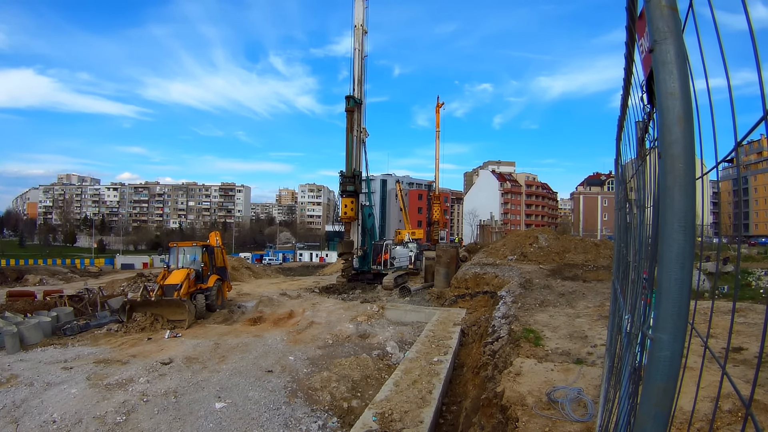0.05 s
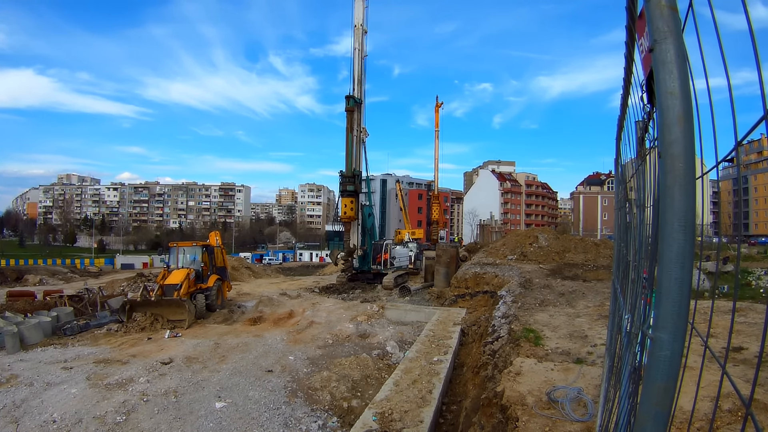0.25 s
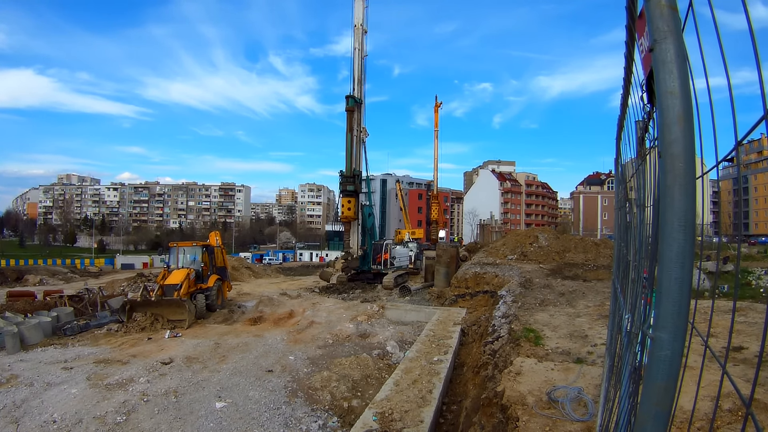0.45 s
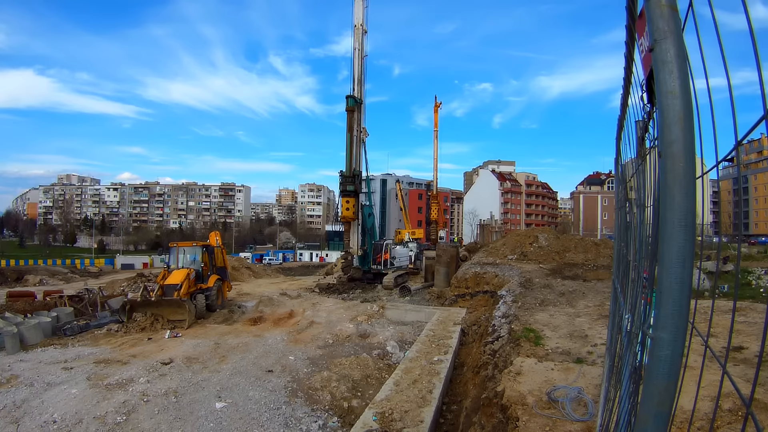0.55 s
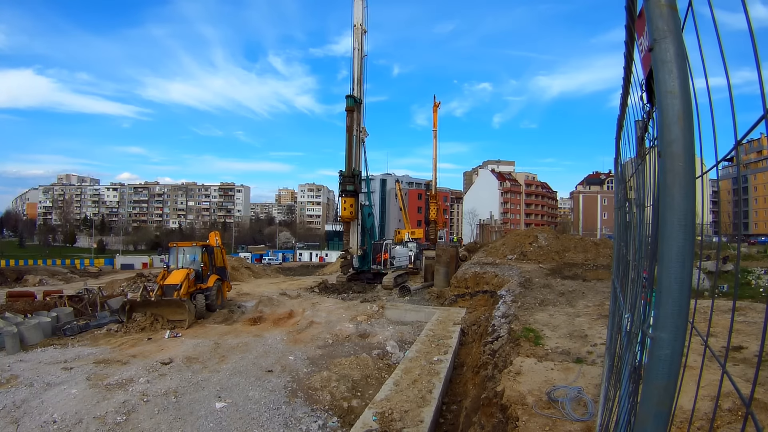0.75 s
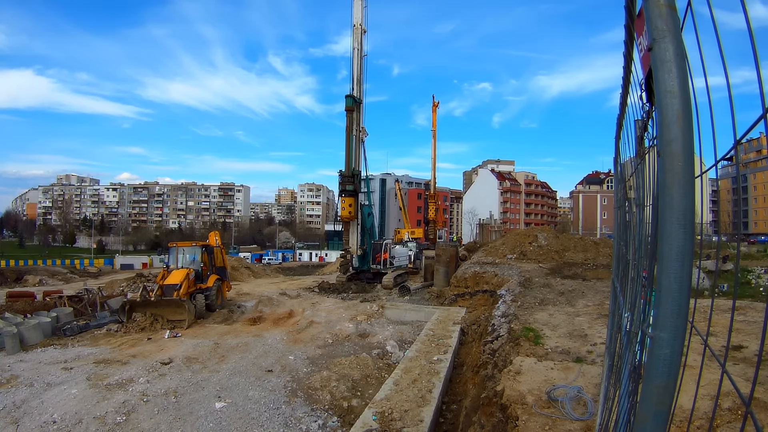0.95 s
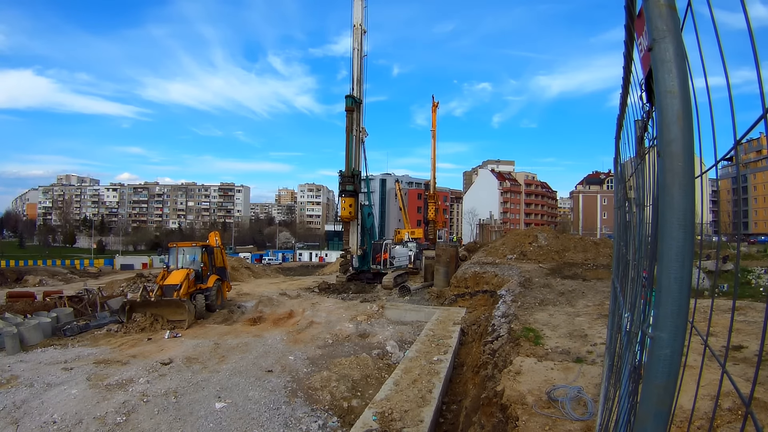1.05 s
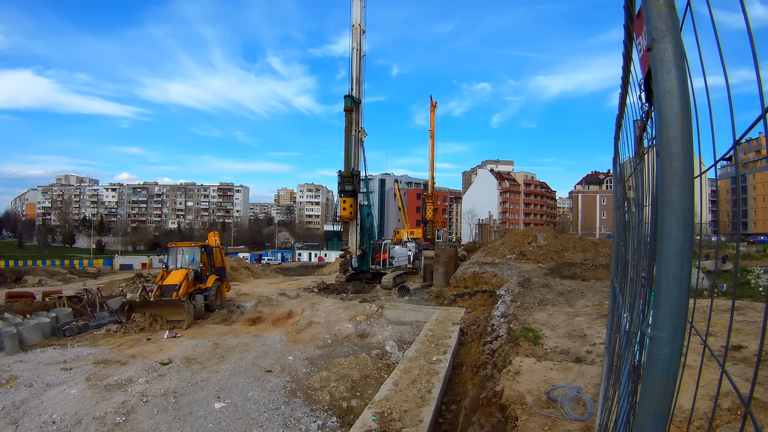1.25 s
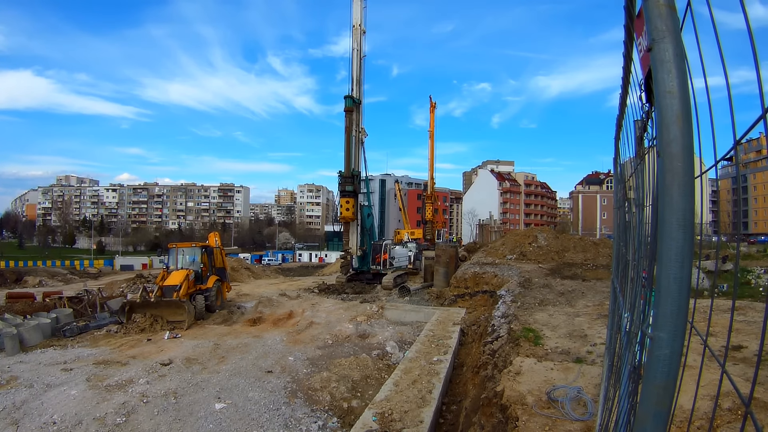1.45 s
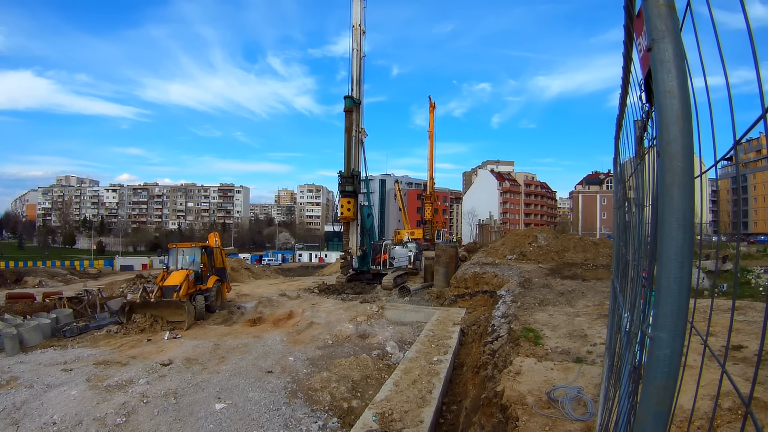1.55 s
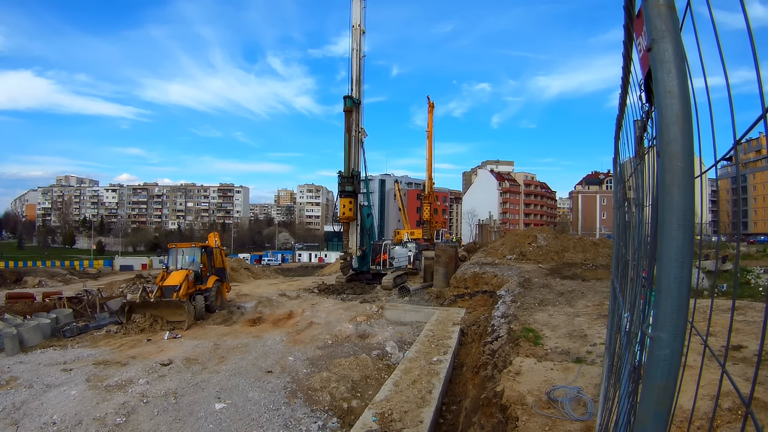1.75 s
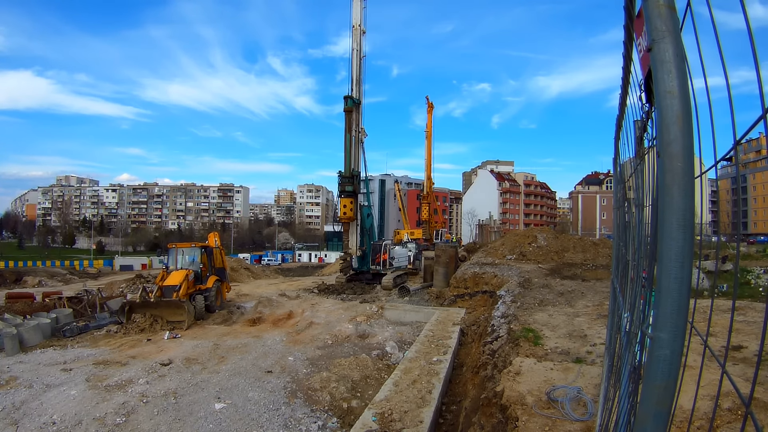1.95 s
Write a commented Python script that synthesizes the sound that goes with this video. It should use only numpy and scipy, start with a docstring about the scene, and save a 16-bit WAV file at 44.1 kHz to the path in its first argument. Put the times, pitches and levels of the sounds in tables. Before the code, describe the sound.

A drilling rig bangs heavily at about 0.2 seconds: a low thump and a short steel clatter that rings on and echoes off nearby buildings. Loose parts knock lightly at the start and between 0.5 and 0.8 seconds. A second, slightly softer bang comes at 1.2 seconds, with small knocks near 1.7. Underneath are a very faint distant diesel hum, microphone hiss and a thin whine.

```python
"""Drilling rig on a building site

A rig jerks its steel drill string to and fro: two heavy bangs a second apart. Each is a low thump
of the frame and a tenth of a second of steel clatter, which rings on in the string's modes and
echoes off the surrounding blocks. Loose parts knock in between, and a diesel hums far off.
The camera adds hiss and a thin whine, and its expander turns the quiet stretches down."""
import sys
import numpy as np
from scipy import signal
from scipy.fft import rfft, irfft, next_fast_len
from scipy.io import wavfile

SR = 44100
rng = np.random.default_rng(int(sys.argv[2]) if len(sys.argv) > 2 else 0)


def wav_out(sig):
    """Save sig, one row per channel (or a flat mono array), as 16-bit PCM at SR to the path in sys.argv[1]."""
    wavfile.write(sys.argv[1], SR, np.round(np.clip(np.atleast_2d(sig).T, -1, 1) * 32767).astype(np.int16))


N = 88200
ATTACK_S = 0.0033  # rise of a bang or a knock

# spectrum of the struck steel: (frequency [Hz], relative density [dB])
STEEL_SPECTRUM = [(60, -27.5), (130, -29.5), (205, -13.5), (290, -14.5), (420, -18), (540, -11.5),
                  (690, -7.5), (780, -12), (920, -7.5), (1090, -4.5), (1200, -12), (1300, -4.5),
                  (1450, -0.5), (1600, -1), (1720, -11.5), (1850, -17), (2300, -27), (2600, -20),
                  (3050, -21), (3300, -32.5), (3850, -21), (4250, -35), (5000, -32), (5800, -29.5),
                  (6500, -37), (7800, -39), (9300, -36.5), (10300, -45.5), (15500, -46)]
# modes of the drill string: (frequency [Hz], forward level [dB], reverse level [dB], T60 [s])
STRING_MODES = [(205.2, -56, -41.5, 0.95), (260.4, -36.5, -51, 0.6), (310, -39, -45.5, 0.88),
                (365.8, -37, -43, 0.45), (462.7, -55, -41.5, 0.77), (530.8, -32, -36.5, 0.69),
                (673, -32, -33, 0.68), (1038.5, -33, -45, 1), (1087, -22.5, -34, 0.39),
                (1163, -32.5, -33, 0.79), (1257, -31.5, -41, 0.71), (1300, -34, -35.5, 0.81),
                (1415, -20.5, -35, 0.55), (1448, -55, -24.5, 0.68), (1463, -22.5, -35, 0.81),
                (1600, -38, -26, .6), (1597, -25.5, -36, 0.58), (1700, -45, -48, 0.74),
                (3880, -48, -58, .7)]
# bangs, forward then reverse: (time [s], level [dB], length [s], treble gain [dB], echo level [dB])
BANG_EVENTS = [(0.201, -22.5, 0.069, 4, -28), (1.228, -26, 0.087, 0.5, -33.5)]
def bangs():
    """Impact excitation: a burst of clatter, then free vibration of the drill string's normal modes."""
    treble_filter = signal.butter(2, 2200, "high", fs=SR, output="sos")
    radiation_filter = signal.butter(2, 90, "high", fs=SR, output="sos")
    out = 0
    for stroke, (start, db, length, treble_db, _) in enumerate(BANG_EVENTS):
        clatter = coloured(grains() * envelope(start, ATTACK_S, length, t60=0.41), STEEL_SPECTRUM)
        treble = signal.sosfiltfilt(treble_filter, clatter)
        out += from_db(db) * (clatter + (from_db(treble_db) - 1) * treble)
        delays = rng.uniform(0.00203, 0.02, len(STRING_MODES))
        for (hz, *stroke_db, t60), delay in zip(STRING_MODES, delays):
            out += from_db(stroke_db[stroke]) * ring(click(start + delay), hz, t60)
    return signal.sosfilt(radiation_filter, out)


# hard steel contacts within the bangs: (time [s], relative level [dB])
CONTACT_EVENTS = [(.206, 0), (0.214, -7), (0.229, -2), (0.241, -4.5), (.270, 4), (0.294, -4), (0.336, -5),
                  (0.343, -13.5), (0.379, -11), (1.236, -5), (1.241, -10), (1.260, -2.5), (1.276, -8),
                  (1.288, -9.5), (1.317, -33), (1.332, -7), (1.378, -11), (1.390, -19.5)]
def contacts():
    """Transient response: each hard hit gives a crunch and a short burst of the main resonance."""
    resonance_hz, rise_s = 1502, 0.002
    crunch = coloured(grains(), STEEL_SPECTRUM)
    detunings = rng.normal(0, 0.02, len(CONTACT_EVENTS))
    out = 0
    for (start, db), detune in zip(CONTACT_EVENTS, detunings):
        tone = np.sin(2 * np.pi * resonance_hz * (1 + detune) * (seconds() - start))
        shape = envelope(start, rise_s, 2 * rise_s, t60=0.039)
        out += from_db(db) * shape * (from_db(-16) * tone + from_db(-24.5) * crunch)
    return out


# blows to the rig's frame: (time [s], level [dB])
THUMP_EVENTS = [(0.198, -21), (0.79, -43), (1.227, -20.5)]
def thumps():
    """Damped oscillation: blows excite one low mode of the frame, with almost nothing below it."""
    blows = sum(from_db(db) * click(start) for start, db in THUMP_EVENTS)
    frame = resonance(blows, hz=216, width_hz=58)
    return signal.sosfilt(signal.butter(4, 172, "high", fs=SR, output="sos"), frame)


# spectrum of steel sliding on steel: (frequency [Hz], relative density [dB])
SCRAPE_SPECTRUM = [(800, -33), (2000, -8), (3000, 6), (4300, -13.5), (5800, 4.5), (7000, -9), (9300, -8),
                   (10500, -15.5), (12500, -11), (15500, -26)]
# slips within the bangs: (time [s], level [dB], length [s])
SCRAPE_EVENTS = [(0.197, -36, 0.019), (0.258, -36.5, 0.017), (1.23, -40, 0.011), (1.334, -46.5, 0.015)]
def scrapes():
    """Friction noise: brief bright rasps where the steel slips."""
    slips = sum(from_db(db) * envelope(start, 0.0058, length, t60=0.17)
                for start, db, length in SCRAPE_EVENTS)
    return coloured(grains(), SCRAPE_SPECTRUM) * slips


# reverberation time of the site: (frequency [Hz], T60 [s])
ECHO_DECAY = [(150, 1.47), (500, 1.306), (1400, 1.36), (3000, 0.85), (9000, 1.6)]
# colour of the reverberation: (frequency [Hz], gain [dB])
ECHO_GAIN = [(150, -4.5), (500, -0.5), (1400, -3), (2200, 1.5), (4000, 0.5), (9000, -6.5)]
def echoes():
    """Diffuse reverberation: buildings scatter each bang into a tail, each band at its own decay rate."""
    build_s = 0.1
    wash = noise(STEEL_SPECTRUM)
    edges_hz = np.geomspace(90, 14000, 8)
    out = 0
    for low, high in zip(edges_hz, edges_hz[1:]):
        centre_hz = np.sqrt(low * high)
        band = signal.sosfiltfilt(signal.butter(3, [low, high], "band", fs=SR, output="sos"), wash)
        t60 = at_hz(ECHO_DECAY, centre_hz)
        tails = sum(from_db(db) * envelope(start, build_s, build_s, t60) for start, *_, db in BANG_EVENTS)
        out += from_db(at_hz(ECHO_GAIN, centre_hz)) * band * tails
    return out


# spectrum of the light rattle: (frequency [Hz], relative density [dB])
RATTLE_SPECTRUM = [(100, -57), (220, 3.5), (400, -3.5), (540, 2), (1400, -5), (2000, -9.5), (2800, -6.5),
                   (3300, -18), (3850, -5.5), (4400, -21), (6000, -17), (12000, -37)]
# knocks of loose parts: (time [s], ring level [dB], rattle level [dB], length [s])
KNOCK_EVENTS = [(-0.008, -43.5, -46, .012), (0.021, -40.5, -49, .022), (0.543, -45, -56, 0.013),
                (0.684, -48.5, -55.5, 0.019), (0.788, -47, -50.5, 0.022), (1.659, -55, -52.5, 0.013),
                (1.691, -43.5, -80, 0.0056)]
def knocks():
    """Forced resonance: rattling parts set the steel singing, and one clear mode outlasts the rest."""
    singing = grains()
    for _ in range(2):  # two passes steepen the flanks of the resonance
        singing = resonance(singing, hz=1482, width_hz=188)
    singing = unit_rms(singing)
    rattle = coloured(grains(), RATTLE_SPECTRUM)
    bursts = strikes = 0
    for start, ring_db, rattle_db, length in KNOCK_EVENTS:
        shape = envelope(start, ATTACK_S, length, t60=0.24)
        bursts += shape * (from_db(ring_db) * singing + from_db(rattle_db) * rattle)
        strikes += from_db(ring_db - 4) * click(start + ATTACK_S)
    return bursts + ring(strikes, hz=1450, t60=0.45)


def diesel():
    """Periodic firing: a distant engine hums one note that wavers in phase and level."""
    firing_hz = 102.5
    waver = np.interp(seconds(), np.linspace(0, N / SR, 24), rng.standard_normal(24))
    hum = np.sqrt(2) * np.sin(2 * np.pi * firing_hz * seconds() + 0.4 * waver)
    return from_db(-63 - 0.3 * waver) * hum


# spectrum of the distant site: (frequency [Hz], relative density [dB])
SITE_SPECTRUM = [(20, -4), (60, -1), (100, -8), (150, -3), (300, -1.5), (600, -4), (1000, -3.5),
                 (1480, 5.5), (1900, -10.5), (4000, -26), (12000, -44)]
def site_noise():
    """Stationary noise: the distant site is a steady broadband wash."""
    return from_db(-49.5) * noise(SITE_SPECTRUM)


def from_db(db):
    """Amplitude ratio of a level in decibels."""
    return 10 ** (np.asarray(db) / 20)


def unit_rms(x):
    """Normalisation to unit mean power."""
    return x / np.sqrt(np.mean(x ** 2) + 1e-20)


def seconds():
    """Time of every sample."""
    return np.arange(N) / SR


def at_hz(points, hz):
    """Interpolation of a table on a log-frequency axis."""
    frequencies, values = np.transpose(points)
    return np.interp(np.log(np.maximum(hz, 1)), np.log(frequencies), values)


def coloured(x, spectrum):
    """Minimum-phase filtering to the given spectrum; keeps the power of white noise."""
    size = next_fast_len(2 * N)
    gain = unit_rms(from_db(at_hz(spectrum, np.arange(size // 2 + 1) * SR / size)))
    cepstrum = irfft(np.log(gain), size)
    cepstrum[1:size // 2] *= 2  # folding onto positive time makes the filter causal
    cepstrum[size // 2 + 1:] = 0
    return irfft(rfft(x, size) * np.exp(rfft(cepstrum)), size)[:N]


def noise(spectrum):
    """Coloured Gaussian noise of unit power."""
    return unit_rms(coloured(rng.standard_normal(N), spectrum))


def grains(per_second=6000, spread_db=3.5):
    """Shot noise: dense random clicks of uneven size, at unit power."""
    hits = rng.random(N) < per_second / SR
    signs = rng.choice([-1, 1], N)
    sizes = from_db(spread_db * np.clip(rng.standard_normal(N), -2, 2))
    return unit_rms(hits * signs * sizes)


def click(time_s):
    """A unit impulse."""
    return (np.arange(N) == int(time_s * SR)) * 1.0


def ring(x, hz, t60):
    """Damped oscillator: a unit impulse starts a decaying sine of height 1."""
    radius = from_db(-60 / (t60 * SR))
    angle = 2 * np.pi * hz / SR
    return signal.lfilter([0, np.sin(angle)], [1, -2 * radius * np.cos(angle), radius ** 2], x + 1e-18)


def resonance(x, hz, width_hz):
    """A mode whose decay time is inversely proportional to its bandwidth."""
    return ring(x, hz, np.log(1000) / (np.pi * width_hz))


def envelope(start, attack, length, t60):
    """Linear rise, hold until start + length, exponential decay."""
    age = seconds() - start
    return np.clip(age / attack, 0, 1) * np.exp(-np.log(1000) * np.maximum(age - length, 0) / t60)


def smooth(x, time_s, initial):
    """First-order lag that sets out from an initial value."""
    pole = np.exp(-1 / (time_s * SR))
    return signal.lfilter([1 - pole], [1, -pole], x - initial) + initial


def scene():
    """Superposition of the rig and the site around it, in mono."""
    rig = bangs() + contacts() + thumps() + scrapes()
    return (rig + echoes() + knocks() + diesel() + site_noise())[None]


def expander(x):
    """Downward expansion: below a threshold the gain falls with the level, at a limited rate."""
    threshold_db, range_db, slope, close_db_per_s = -40.5, 10, 1.056, 55
    power = smooth(x ** 2, time_s=0.036, initial=from_db(threshold_db) ** 2)
    level_db = 10 * np.log10(power + 1e-12)
    gain_db = np.clip(slope * (level_db - threshold_db), -range_db, 0)
    fall_db = close_db_per_s * seconds()
    gain_db = np.maximum.accumulate(gain_db + fall_db) - fall_db  # limits only the fall
    return x * from_db(smooth(gain_db, time_s=0.02, initial=-range_db / 2))


# spectrum of the microphone hiss: (frequency [Hz], relative density [dB])
HISS_SPECTRUM = [(1000, -4.5), (4000, 1.5), (8000, -1), (9500, 3), (11500, -2), (13000, 0.5), (15500, 1.5)]
# whine of the camera electronics: (frequency [Hz], level [dB])
WHINE_TONES = [(6857, -70), (13714, -58.5)]
def record(dry):
    """Self-noise and band limiting: the camera adds hiss and whine, expands, then cuts the top."""
    hiss = from_db(-54.5) * noise(HISS_SPECTRUM)
    whine = sum(np.sqrt(2) * from_db(db) * np.sin(2 * np.pi * hz * seconds()) for hz, db in WHINE_TONES)
    lowpass = signal.ellip(12, 0.1, 90, 15800, fs=SR, output="sos")
    return signal.sosfilt(lowpass, expander(dry[0] + hiss + whine))[None]


dry = scene()
out = record(dry)
wav_out(out)
```